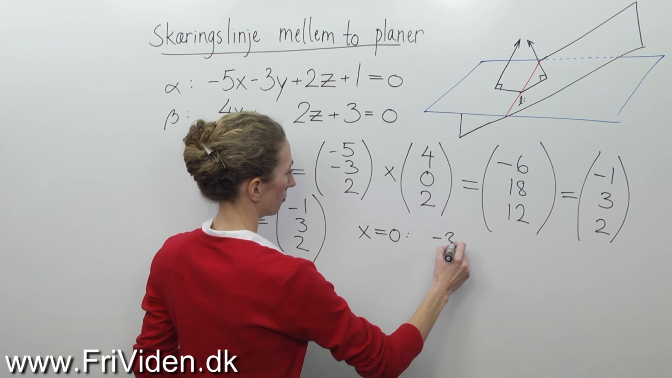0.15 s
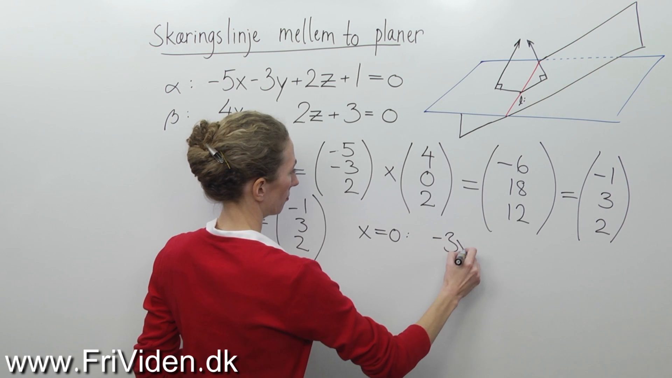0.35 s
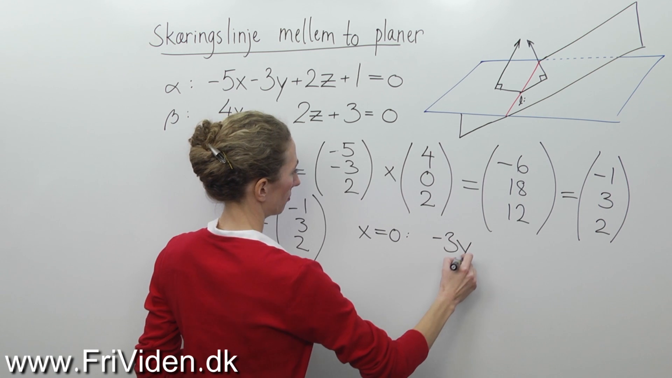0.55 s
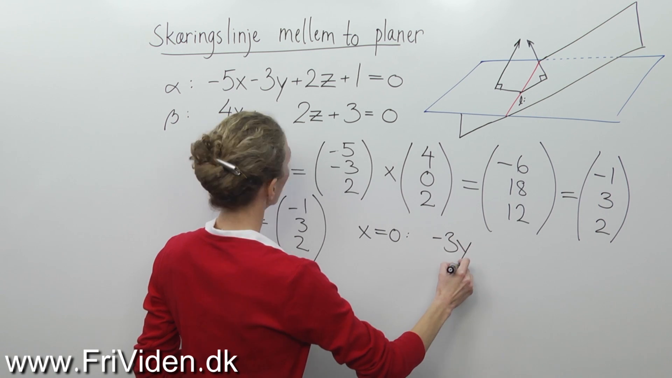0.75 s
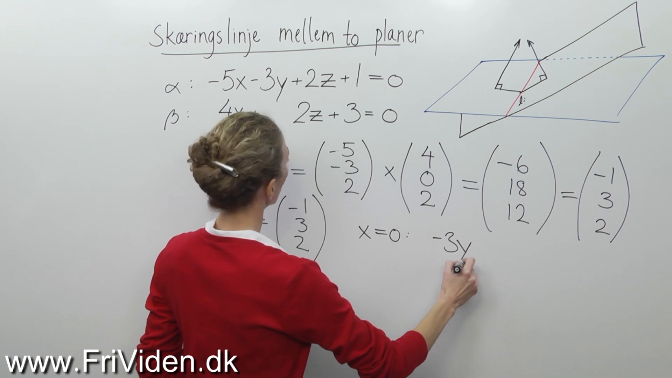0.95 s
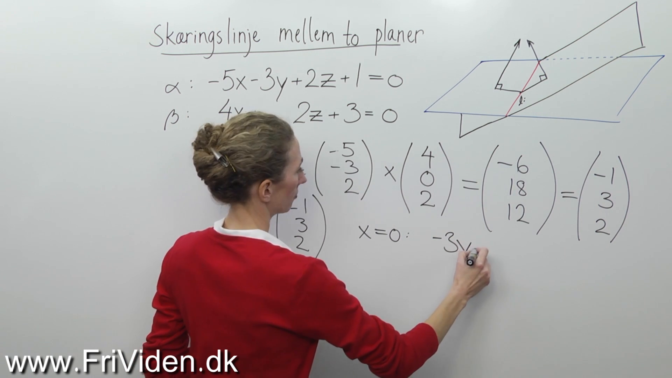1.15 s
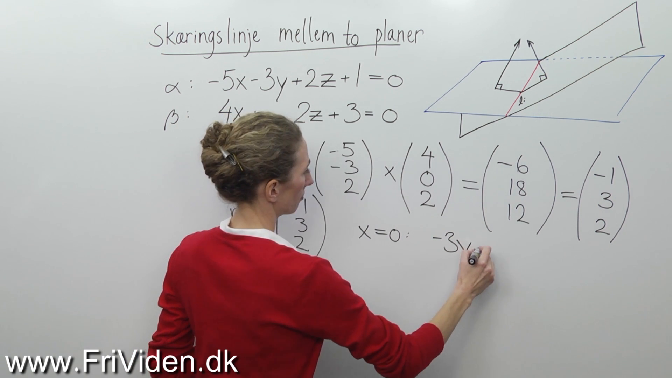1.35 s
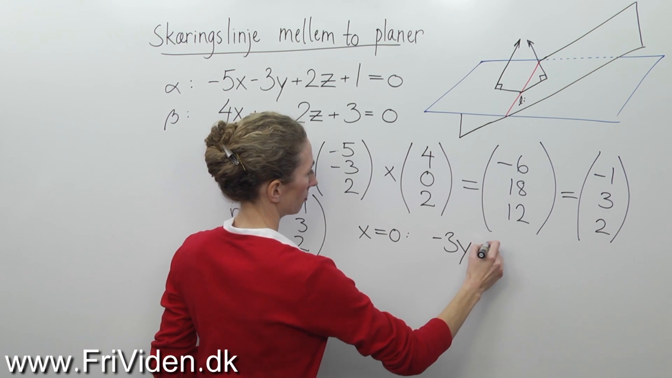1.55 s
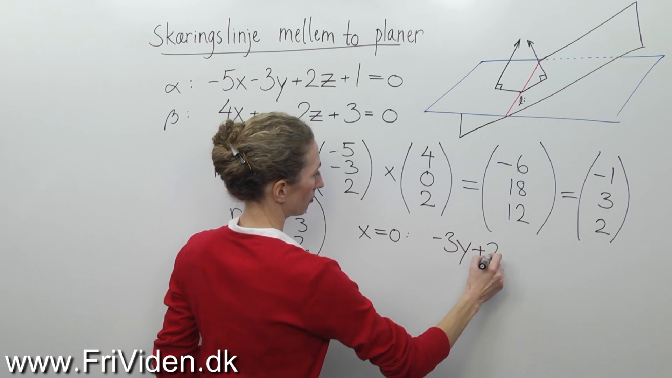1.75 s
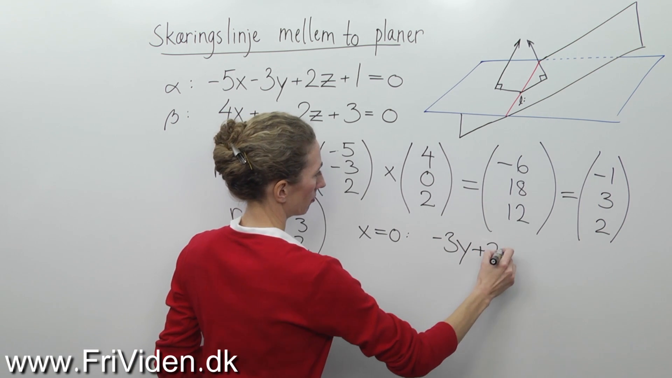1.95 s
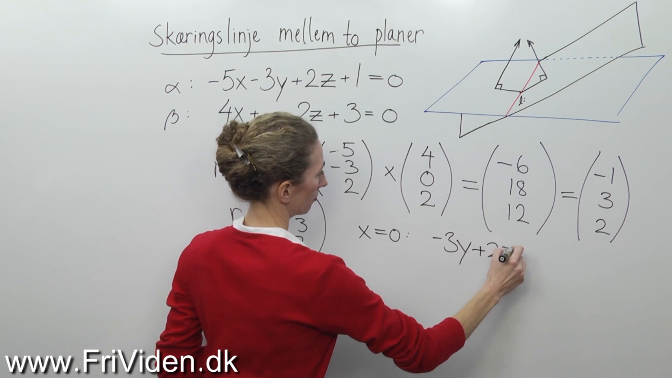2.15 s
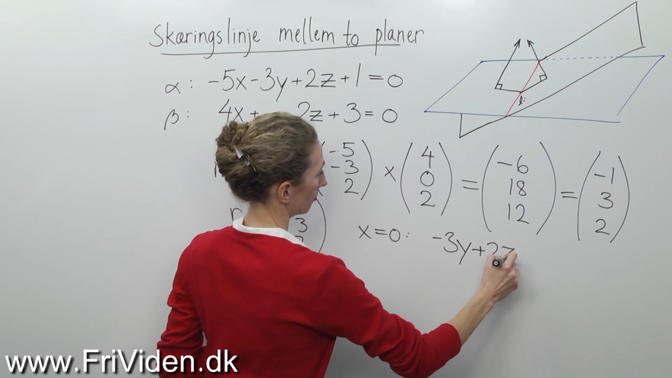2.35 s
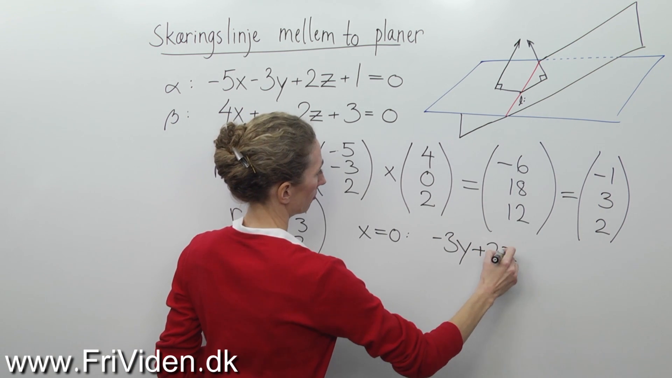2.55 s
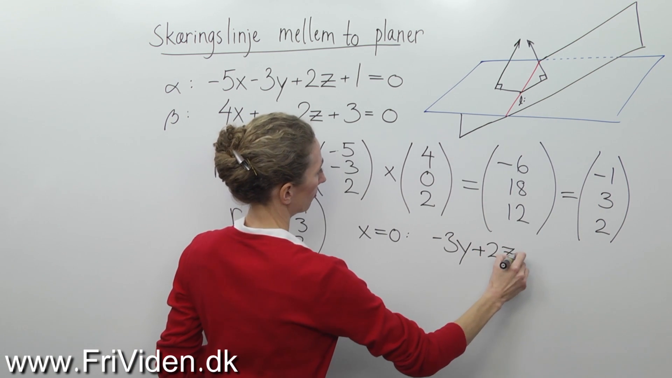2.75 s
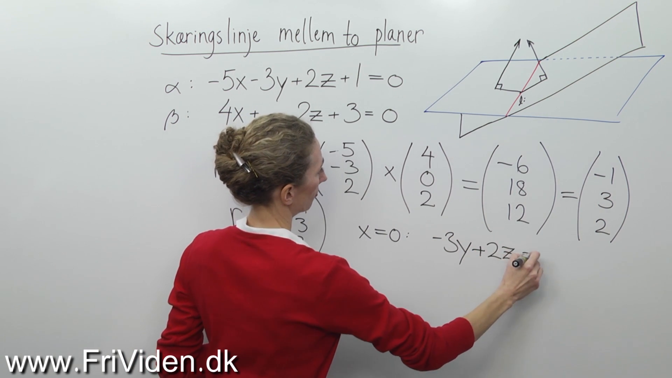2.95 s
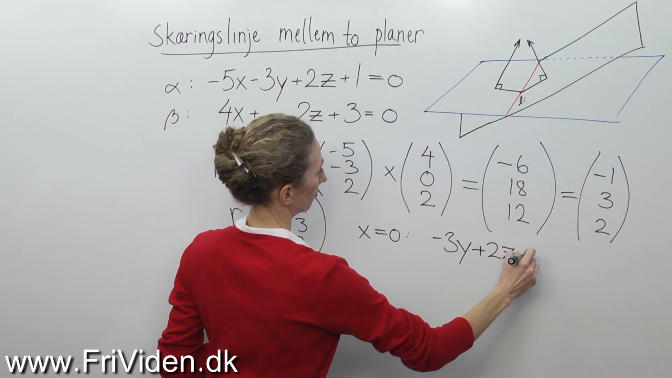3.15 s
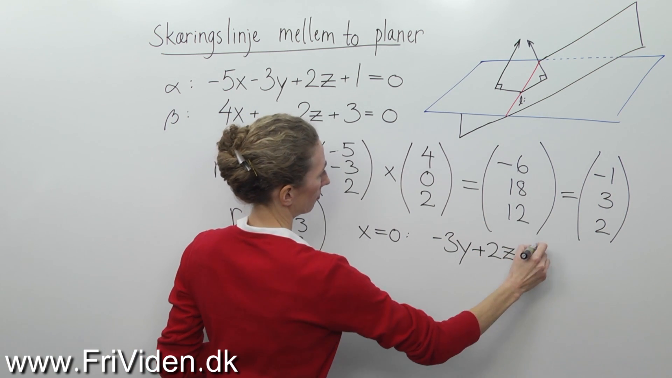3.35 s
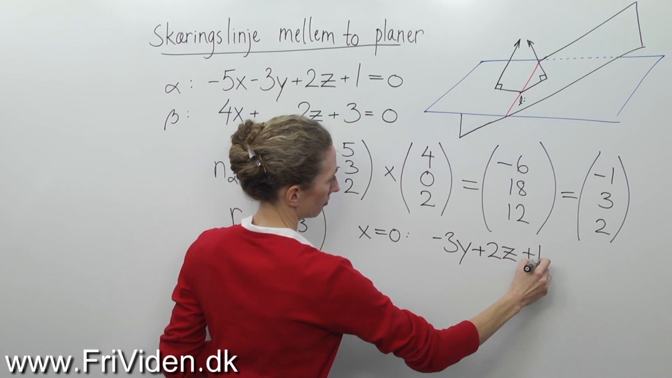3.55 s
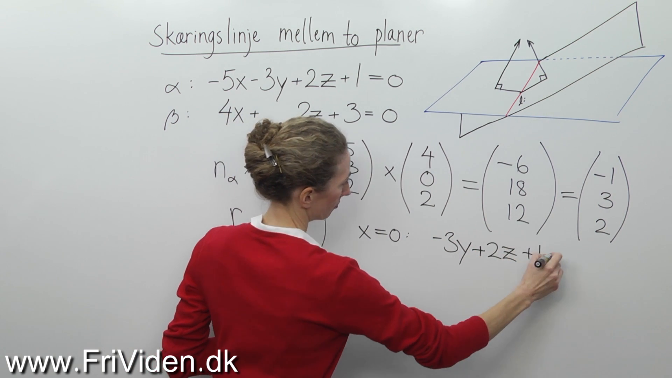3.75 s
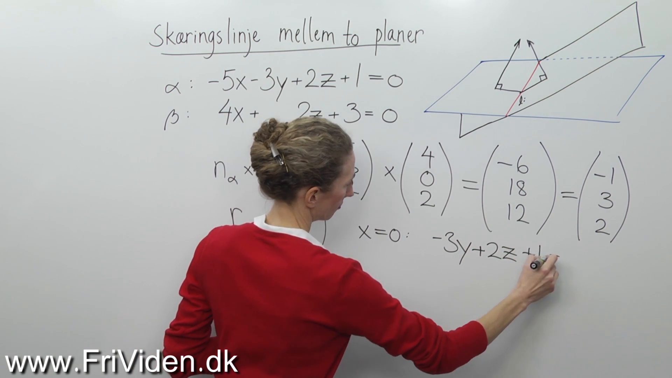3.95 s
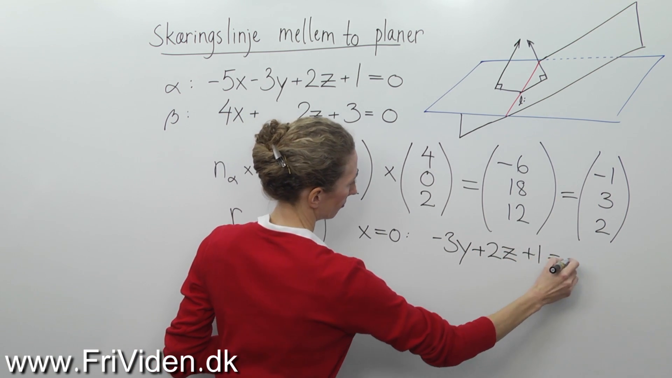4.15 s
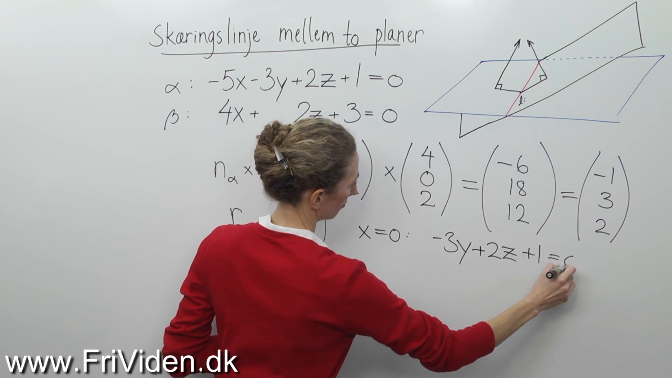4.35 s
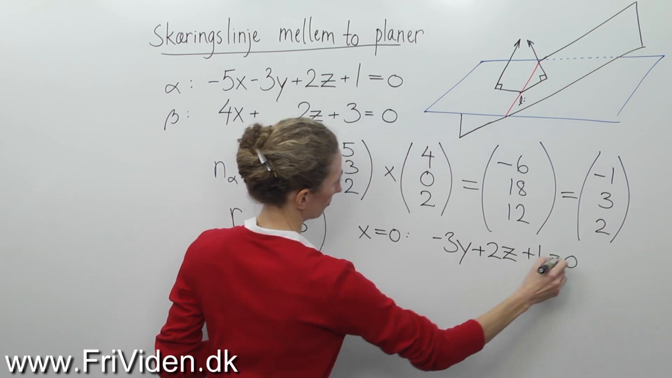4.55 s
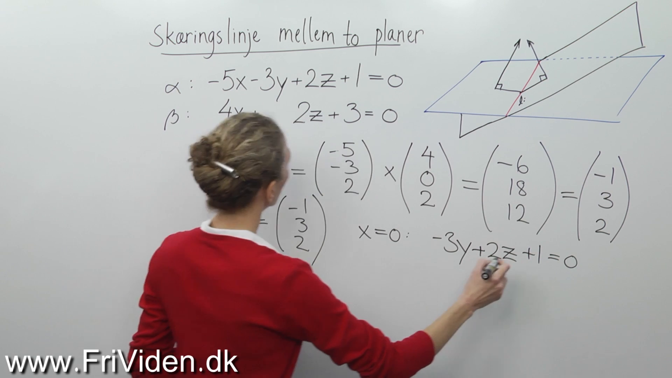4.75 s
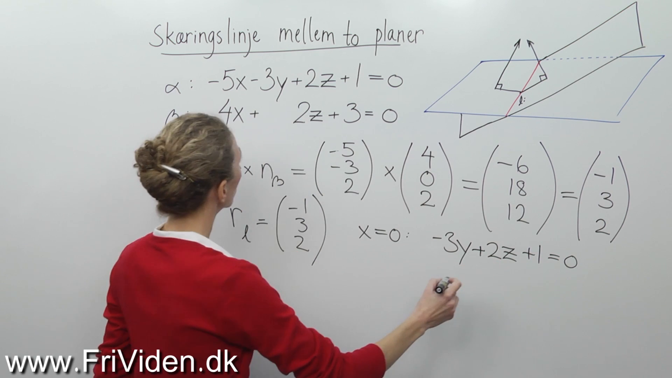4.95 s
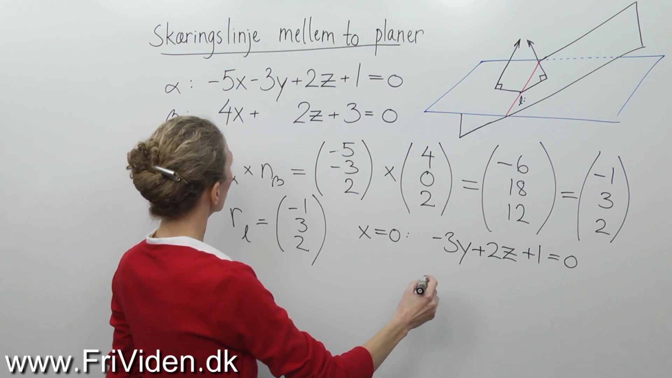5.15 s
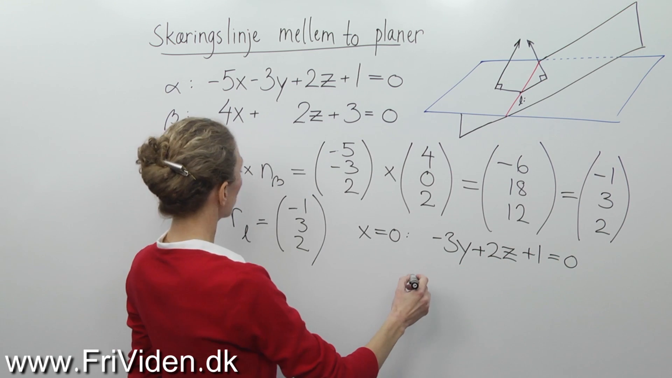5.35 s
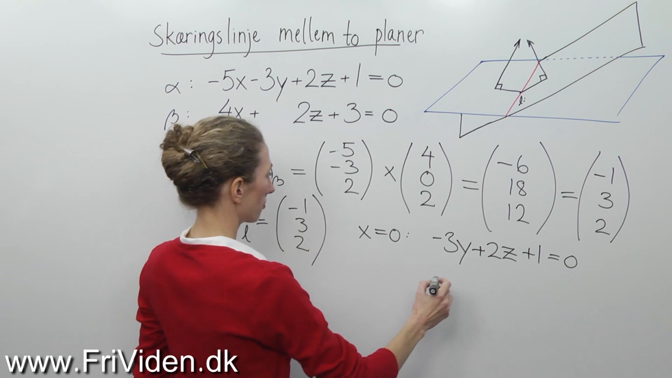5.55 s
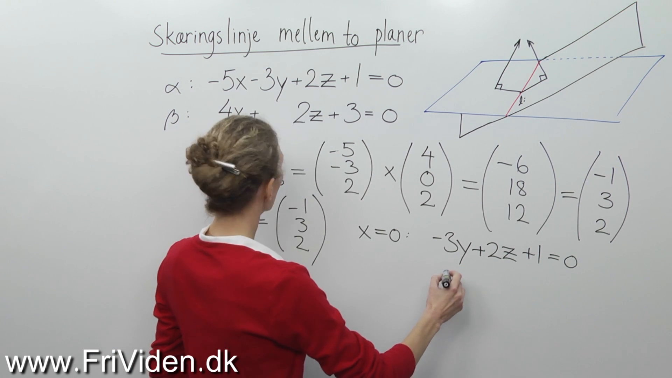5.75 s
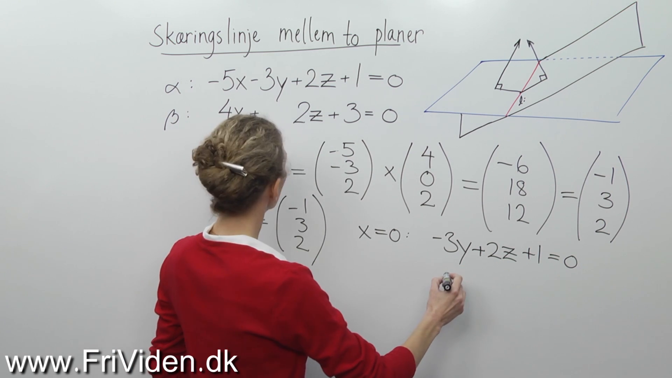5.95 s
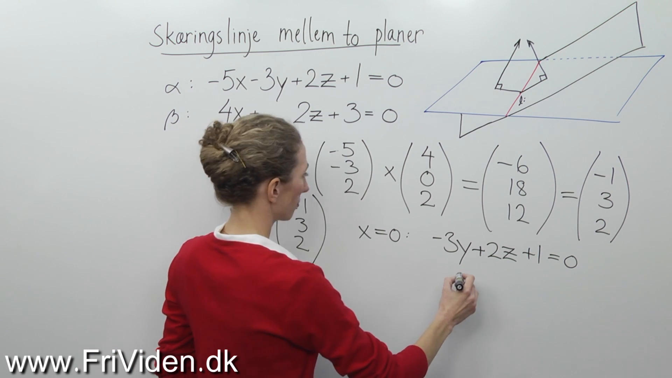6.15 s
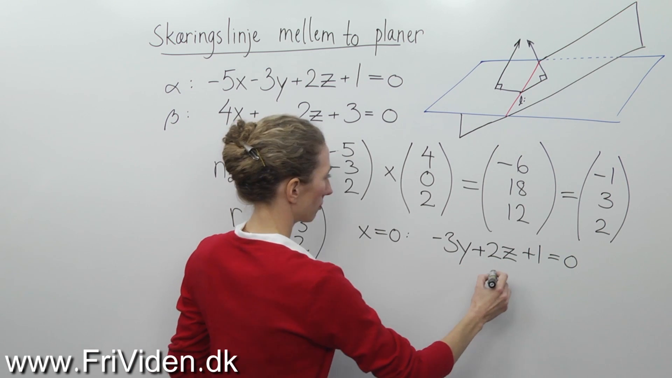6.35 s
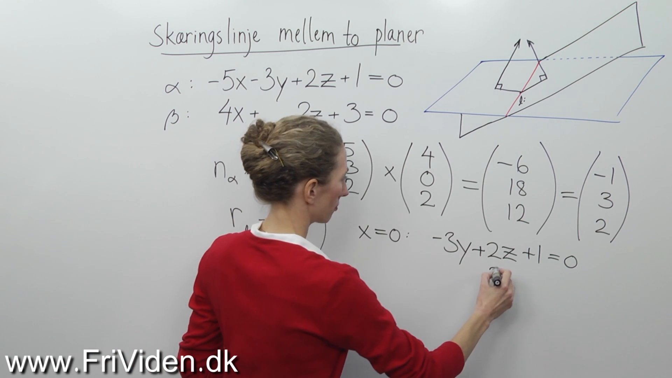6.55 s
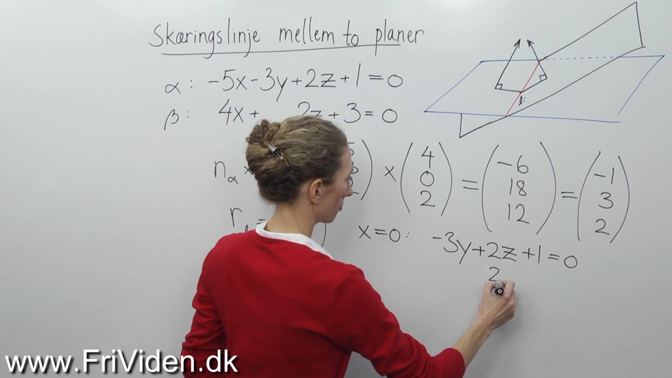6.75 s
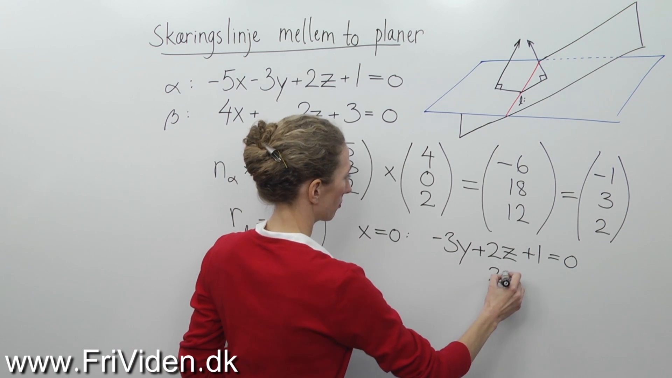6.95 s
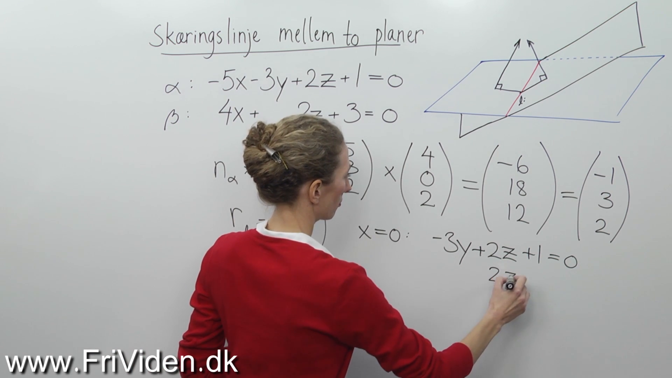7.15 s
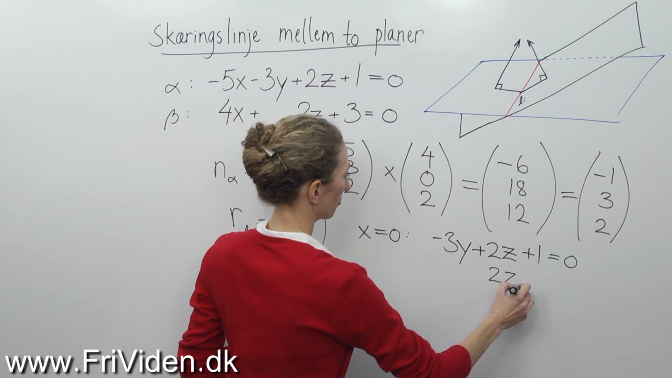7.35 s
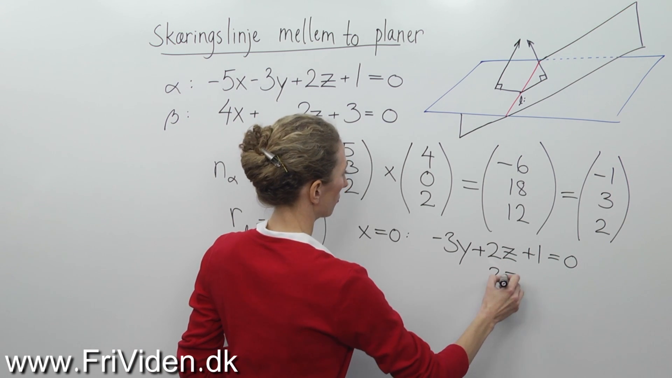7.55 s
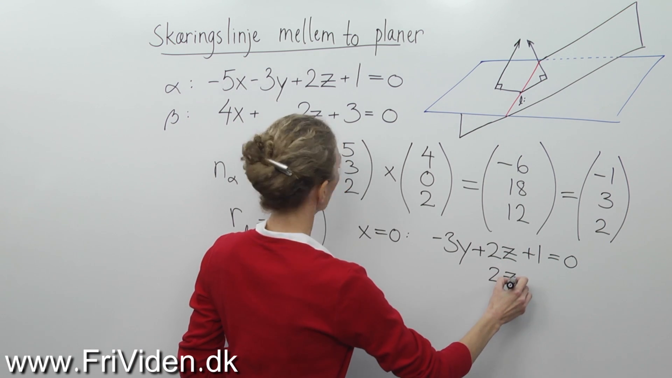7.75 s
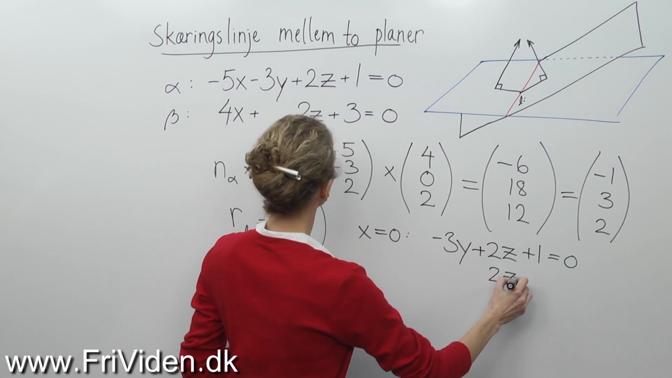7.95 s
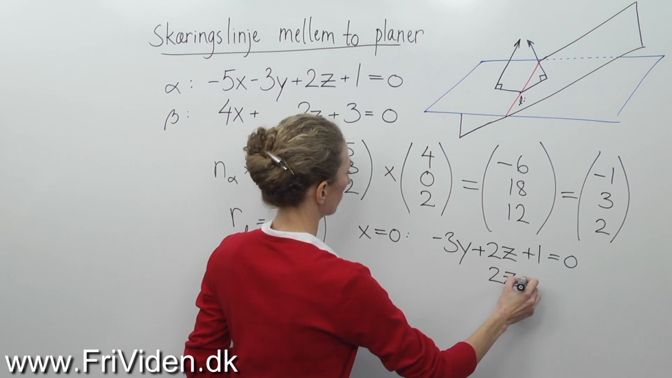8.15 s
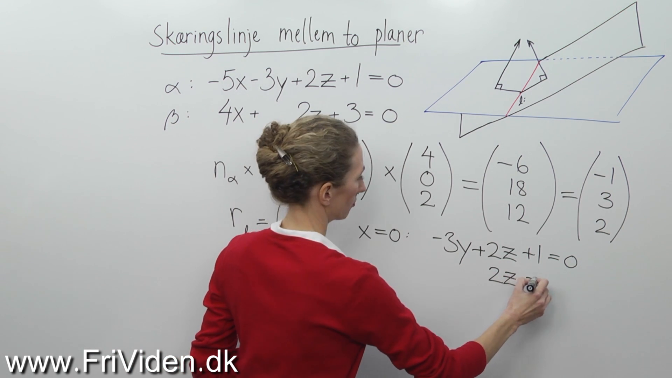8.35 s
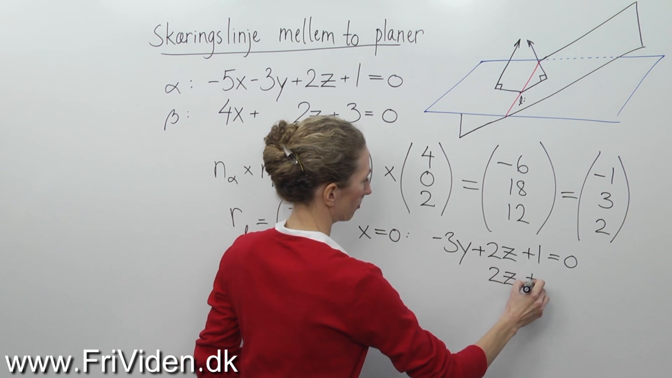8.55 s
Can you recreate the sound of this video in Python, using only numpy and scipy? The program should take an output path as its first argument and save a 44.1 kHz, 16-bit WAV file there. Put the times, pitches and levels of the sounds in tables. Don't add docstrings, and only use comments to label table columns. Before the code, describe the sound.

Short, quick writing on a wall-mounted board: soft woody thumps as the marker lands, brief high whispery rubs as it moves, and occasional small plastic clacks from its barrel. After a dense run of strokes there is only room air, then a second, sparser group of taps and dry scuffs. The room is small and lightly reverberant, heard from some metres away with steady low fan rumble.

```python
import sys
import numpy as np
from scipy import signal
from scipy.io import wavfile
from scipy.ndimage import uniform_filter1d

SR = 44100
rng = np.random.default_rng(int(sys.argv[2]) if len(sys.argv) > 2 else 0)


def file_out(sig):
    cols = np.atleast_2d(sig).T
    lim = np.clip(cols, -1, 1)
    pcm = np.round(lim * 32767).astype(np.int16)
    wavfile.write(sys.argv[1], SR, pcm)


def ratio_of_db(decibels):
    return 10 ** (np.asarray(decibels, float) / 20)


N = 380334


def evened(x):
    return x / np.sqrt(np.mean(x ** 2) + 1e-20)


def read(points, hz):
    point_hz, value = np.transpose(points)
    return np.interp(np.log(hz + 1), np.log(point_hz + 1), value)


def add(mix, start_s, sound):
    part = mix[round(start_s * SR):][:len(sound)]
    part += sound[:len(part)]


def resonate(x, hz, width_hz):
    b, a = signal.iirpeak(hz, hz / width_hz, SR)
    return signal.lfilter(b, a, x)


def air():
    # pitch_hz, level_db (per Hz)
    noise_curve = [(12, -46), (24, -10.5), (59, 0.5), (98, -5.5), (119, -15), (137, -9), (171, -6),
                   (196, -20), (219, -13), (416, -21.5), (667, -26.5), (725, -27), (834, -28.5),
                   (1500, -34.5), (15500, -46.5)]
    # pitch_hz, width_hz, level_db
    fan_tones = [(845, 7.5, -82.5), (167.9, 14, -71.5)]
    hop = 512
    frames = N // hop + 5
    hz = np.fft.rfftfreq(2048, 1 / SR)
    real, imaginary, patches = rng.standard_normal((frames, len(hz), 3)).T
    patches = uniform_filter1d(patches, 12, 0)
    patches = evened(uniform_filter1d(patches, 8, 1))

    t = np.arange(frames) * hop / SR
    swell_rates_hz = np.geomspace(0.502, 4, num=20)
    swell = sum(np.sin(2 * np.pi * (rate * t + rng.random())) for rate in swell_rates_hz)
    swell_db = 2 * evened(swell)
    low_share = 1 / (1 + (hz / 95) ** 4)
    curve_db = read(noise_curve, np.minimum(hz, 15400))
    level_db = curve_db[:, None] + 0.49 * patches + low_share[:, None] * swell_db
    spectrum = (real + 1j * imaginary) * ratio_of_db(level_db)
    noise = signal.istft(spectrum, nperseg=2048, noverlap=2048 - hop)[1][:N]

    tones = np.zeros(N)
    for pitch_hz, width_hz, tone_db in fan_tones:
        tones += ratio_of_db(tone_db) * evened(resonate(rng.standard_normal(N), pitch_hz, width_hz))
    return ratio_of_db(-54.5) * evened(noise) + tones


def strokes():
    # pitch_hz, width_hz, level_db
    rub_modes = [(10300, 2800, 0), (13500, 5000, -2), (7500, 5000, -3.5)]
    fizz_modes = [(16700, 2400, 1.5), (15000, 2700, -7)]
    scuff_modes = [(7500, 1800, -1), (5400, 3200, 0), (3400, 2600, -1), (2100, 1500, -3)]
    # start_s, length_s, rub_db (at full speed), fizz_db and scuff_db (beside rub)
    upper_line = [(0.0, 0.06, -71.5, 3, -9), (0.057, 0.084, -68, -4, -17), (0.302, 0.095, -70, 0, -10),
                  (0.415, 0.096, -73.5, -6, -4), (0.533, 0.16, -72.5, -5, -8), (1.201, 0.094, -70, -4, -8),
                  (1.42, 0.067, -75, -7, -6), (1.605, 0.13, -72.5, -5, -13), (1.72, .07, -73.5, -7, -8),
                  (1.807, 0.089, -67, -11, -7), (2.102, 0.097, -69.5, -9, -9), (2.278, .085, -75, -12, -7),
                  (2.393, .105, -71, -10, -8), (2.675, 0.086, -70, -9, -10), (2.952, .085, -72, -16, -15),
                  (3.46, 0.17, -76, -4, -9), (3.79, 0.094, -73, -14, -8), (4.05, 0.066, -73.5, -12, -10),
                  (4.365, 0.12, -72, -7, -5), (4.45, 0.12, -76, -8, -3), (5.098, .17, -77, -5, -1)]
    lower_line = [
        (6.59, 0.079, -74, 4, -7),
        (6.67, .065, -76.5, 5, 0),
        (6.77, 0.094, -83.5, 17, 12),
        (7.05, 0.095, -71.5, 1, -3),
        (7.2, 0.093, -75, 0, -6),
        (7.345, 0.097, -68, -1, -7),
        (7.62, 0.079, -71.5, 1, -2),
        (8.335, .09, -72.5, 1, -6),
    ]
    slips_per_s, catches_per_s, catch_db = 9000, 60, 1.0
    slip_db = 0.86 * np.minimum(rng.exponential(1, N), 5)
    slips = rng.standard_normal(N) * ratio_of_db(slip_db) * (rng.random(N) < slips_per_s / SR)

    voices = []
    for modes in (rub_modes, fizz_modes, scuff_modes):
        unevenness = uniform_filter1d(rng.standard_normal(N), round(SR / catches_per_s))
        grip = ratio_of_db(catch_db * evened(unevenness))
        voice = np.zeros(N)
        for hz, width_hz, db in modes:
            voice += ratio_of_db(db) * resonate(resonate(slips, hz, width_hz), hz, 2 * width_hz)
        voices.append(grip * evened(voice))

    out = np.zeros(N)
    for start_s, length_s, rub_db, fizz_db, scuff_db in upper_line + lower_line:
        at = max(round(start_s * SR), 0) + np.arange(round(length_s * SR))
        speed = np.sin(np.linspace(0, np.pi, len(at))).clip(0)
        for voice, beside_rub_db in zip(voices, (0, fizz_db, scuff_db)):
            out[at] += voice[at] * speed ** 0.54 * ratio_of_db(rub_db + beside_rub_db)
    return out


def tap(blow_db, upper_db, low_db, upper_hz):
    # pitch_hz, mid_panel_db, near_edge_db, length_s, family (0 knock, 1 upper, 2 low)
    bending_waves = [(285.4, -2, -1.5, 0.0093, 0), (194, -8, -19, 0.014, 0), (399, -41, -24, 0.016, 0),
                     (472.5, -15, -26.5, 0.028, 0), (580, 2.5, 1.5, 0.0096, 1), (804, -12, -1.5, 0.012, 1),
                     (904, 9.5, -42, 0.0056, 1), (1076, -1.5, -31, 0.013, 1), (142, 4, 0.5, 0.019, 2)]
    # pitch_hz, mid_panel_db, near_edge_db, t60_s (time to fall 60 dB), family (1 upper, 2 low, 3 middle)
    panel_modes = [(96.26, -3.5, -5.5, 0.58, 2), (139.1, 1, -3, 0.38, 2), (167.5, -3.5, -23, 0.75, 2),
                   (221.5, 11.5, -6.5, 0.28, 3), (240.6, -5, -16, 0.34, 3), (281.6, -6, -38, 0.37, 3),
                   (320, -15, -12, 0.08, 3), (380.6, -6.5, 2, 0.18, 3), (443, -8, -14, .25, 3),
                   (444, -13, -5.5, 0.19, 3), (482.5, -22.5, -12, 0.3, 3), (517, -8, -15, 0.23, 1),
                   (635, -14, -12.5, 0.24, 1), (723, -23, -20, 0.29, 1), (718.4, -11, -10, 0.15, 1),
                   (853, -24, -18, 0.25, 1), (832, -39, -29, 0.26, 1), (913, -21, -23, 0.24, 1),
                   (940, -10, -12, 0.18, 1), (1075, -16, -8, 0.066, 1)]
    t = np.arange(SR // 3) / SR
    edge = np.clip((745 - upper_hz) / 22, 0, 1)
    middle_db = -16.5 + 0.4 * (upper_db + 17.5)
    family_db = (0, upper_db, low_db, middle_db)
    rise_s = (0.0006 + 0.00091 * edge, 0.0018 - 0.00066 * edge, 0.003)
    loss_db_per_s = (0, 400 * edge, 0)

    out = np.zeros(len(t))
    for hz, mid_db, edge_db, length_s, family in bending_waves + [(upper_hz, 4, 5, 0.012, 1)]:
        family = round(family)
        packet = (1 - np.exp(-t / rise_s[family])) * np.exp(-(t / length_s) ** 3)
        db = mid_db + edge * (edge_db - mid_db) + family_db[family]
        out -= ratio_of_db(db - loss_db_per_s[family] * t) * packet * np.sin(2 * np.pi * hz * t)

    fill = (1 - np.exp(-t / 0.0082)) ** 2
    for hz, mid_db, edge_db, t60_s, family in panel_modes:
        size, phase = rng.standard_normal(2)
        db = mid_db + edge * (edge_db - mid_db) + family_db[round(family)] + 1.63 * size
        out -= ratio_of_db(db - 60 * t / t60_s) * fill * np.sin(2 * np.pi * hz * t + 0.37 * phase)

    felt_hz = 1110 * (1 - 0.13 * edge)
    soft_tip = signal.butter(8, felt_hz, fs=SR, output="sos")
    return ratio_of_db(blow_db) * signal.sosfilt(soft_tip, out)


def landings():
    # start_s, blow_db, upper_knock_db, low_boom_db, upper_knock_hz (tells the spot struck)
    tip_landings = [(0.288, -28.5, -15.5, -22.5, 739.6), (1.1873, -29, -14, -23, 740.4),
                    (1.388, -26.5, -15, -23.5, 739.5), (1.6095, -26, -13, -21.5, 739.5),
                    (2.0856, -28, -18, -14.5, 735), (2.6556, -34.5, -31, -14, 700),
                    (2.9449, -28.5, -21.5, -14.5, 730), (3.1789, -28, -18, -13, 732),
                    (3.4673, -28, -19, -12.5, 728), (3.799, -26, -18, -12, 727),
                    (4.018, -27, -17, -9.5, 726), (4.281, -30, -17, -8, 670), (6.571, -31.5, -26, -16, 715),
                    (7.0268, -29, -26.5, -13.5, 726), (7.607, -30.5, -33.5, -13, 696),
                    (8.319, -28.5, -24.5, -11, 688), (8.517, -27, -25, -11, 727)]
    out = np.zeros(N)
    for start_s, *blow in tip_landings:
        add(out, start_s - 0.0008, tap(*blow))
    return out


def clacks():
    # start_s, level_db
    hard_landings = [
        (1.61, -53),
        (3.8048, -56),
        (4.0176, -53),
        (4.285, -49.5),
        (8.519, -55),
    ]
    # pitch_hz, level_db, t60_s
    barrel_modes = [(996, -6, 0.09), (1230, 2, 0.025), (1440, 1.5, 0.017), (1705, -5, 0.026)]
    t = np.arange(SR // 10) / SR
    ring = sum(ratio_of_db(db - 60 * t / t60_s) * np.sin(2 * np.pi * hz * t) for hz, db, t60_s in barrel_modes)
    ring = ring * (1 - np.exp(-t / 0.0019))
    out = np.zeros(N)
    for start_s, level_db in hard_landings:
        add(out, start_s, ratio_of_db(level_db) * ring)
    return out


def squeaks():
    # middle_s, length_s, pitch_hz, level_db
    whistles = [
        (1.85, .03, 2900, -86),
        (2.16, .02, 2900, -81),
        (2.73, .045, 2870, -78),
        (2.75, .025, 2300, -83),
        (2.16, .02, 7500, -81),
        (1.612, .006, 2400, -76),
    ]
    t = np.arange(N) / SR
    noise = rng.standard_normal(N)
    out = np.zeros(N)
    for middle_s, length_s, hz, db in whistles:
        swell = np.exp(-((t - middle_s) / length_s) ** 2)
        out += ratio_of_db(db) * swell * evened(resonate(noise, hz, 45))
    return out


def wall_echoes(board):
    # delay_s, level_db
    bounces = [
        (0.0222, -10.5),
        (.037, -14.5),
        (.066, -19.5),
    ]
    out = np.zeros(N)
    for delay_s, db in bounces:
        add(out, delay_s, ratio_of_db(db) * board)
    b, a = signal.butter(2, 500, "high", fs=SR)
    return signal.lfilter(b, a, out)


def room(x):
    # pitch_hz, t60_s
    decay_curve = [(80, 0.7), (210, 0.58), (560, 0.25), (1500, 0.33), (8000, 0.19)]
    impulses = np.zeros(SR)
    gap = 22
    at = np.arange(500, SR - gap, gap)
    impulses[at + rng.integers(0, gap, len(at))] = rng.choice([-1., 1.], len(at))
    hz, t, z = signal.stft(impulses, SR, nperseg=512)
    decay_db = -60 * t / read(decay_curve, hz)[:, None]
    tail = signal.istft(z * ratio_of_db(decay_db), SR, nperseg=512)[1]
    return signal.fftconvolve(x, tail / np.linalg.norm(tail))[:N]


def scene():
    background = air()
    rub = strokes() + squeaks()
    board = landings() + clacks()
    reverb = room(ratio_of_db(-16.5) * board + ratio_of_db(-10) * rub)
    mix = board + wall_echoes(board) + rub + reverb + background
    return mix[None]


def band_limit(x):
    return signal.sosfilt(signal.butter(12, 17190, fs=SR, output="sos"), x)


def record(dry):
    # from_hz, to_hz
    top_bands = [(15840, 16200), (16200, 16550), (16550, 16900), (16900, 17250)]
    hz, t, z = signal.stft(dry, SR, nperseg=1024)
    is_open = True
    for k, (from_hz, to_hz) in enumerate(top_bands):
        band = (hz >= from_hz) & (hz < to_hz)
        power = (abs(z[:, band]) ** 2).sum(1)
        power = uniform_filter1d(power, size=3, axis=1)
        usual_hiss = np.percentile(power, 30)
        over_db = 4.5 + k * 1.0
        is_open = is_open & (power > ratio_of_db(2 * over_db) * usual_hiss)
        z[:, band] *= is_open[:, None]
    gated = signal.istft(z, SR, nperseg=1024)[1][:, :N]
    return band_limit(gated)


dry = scene()
out = record(dry)
file_out(out)
```